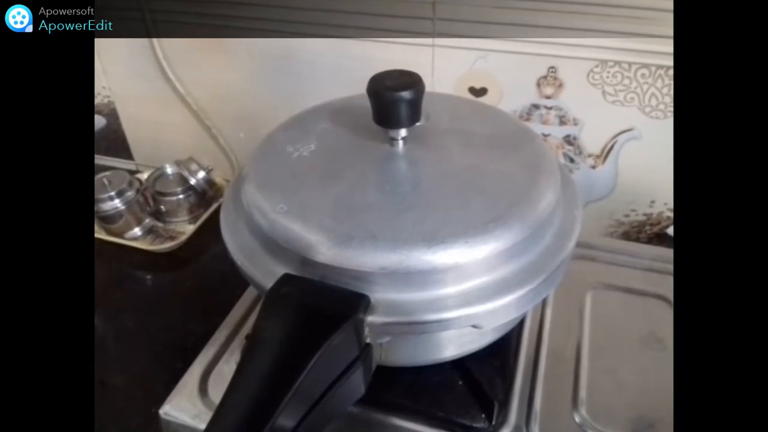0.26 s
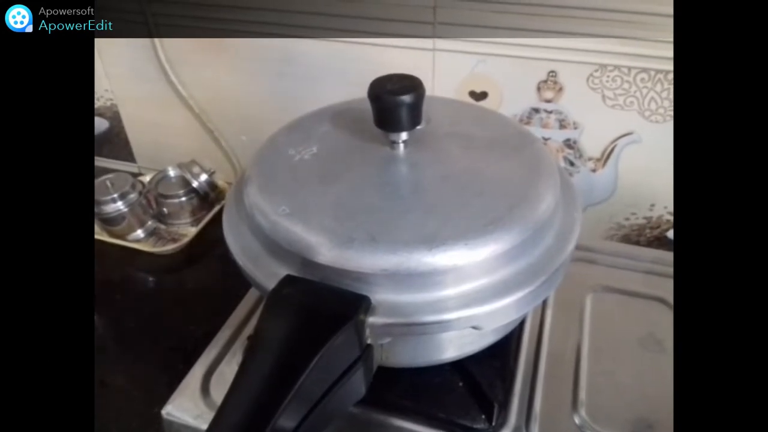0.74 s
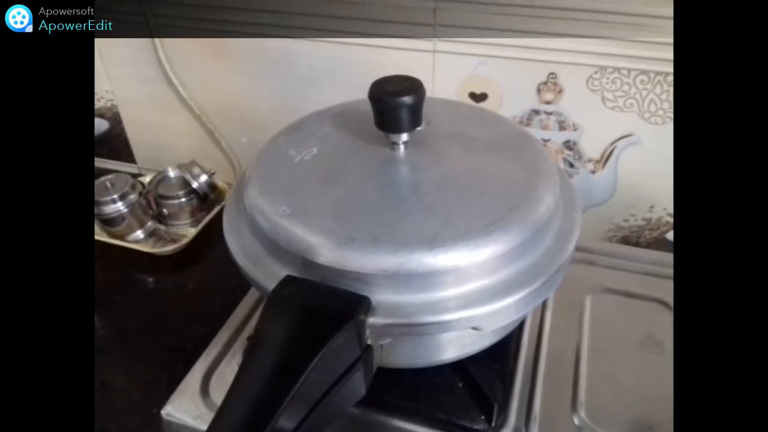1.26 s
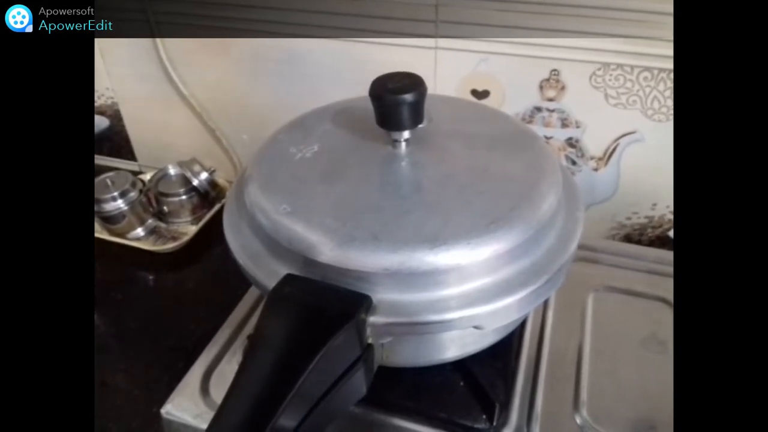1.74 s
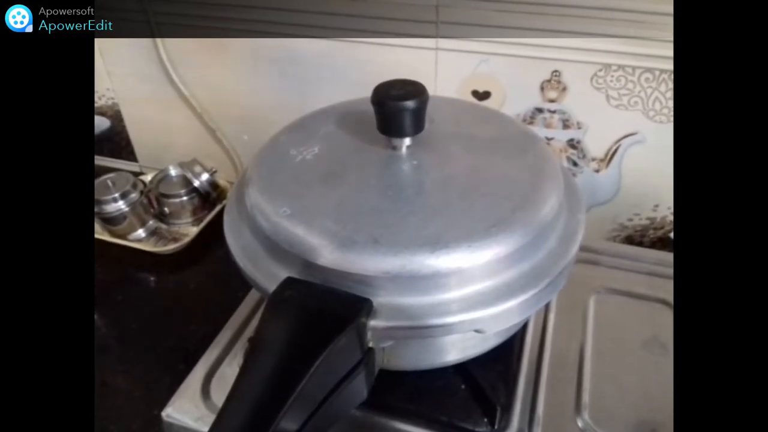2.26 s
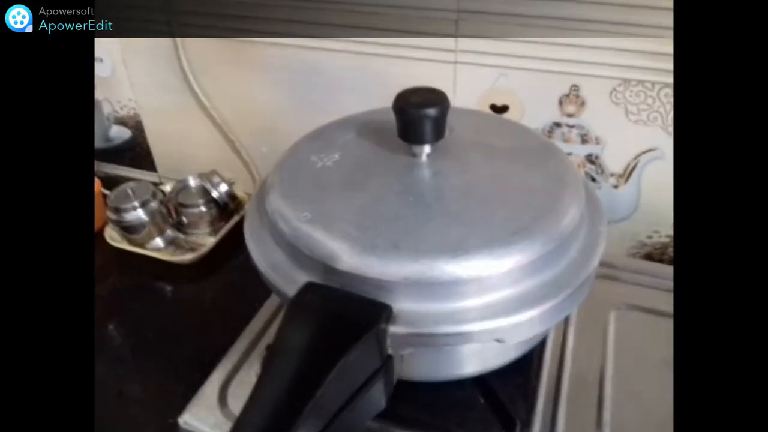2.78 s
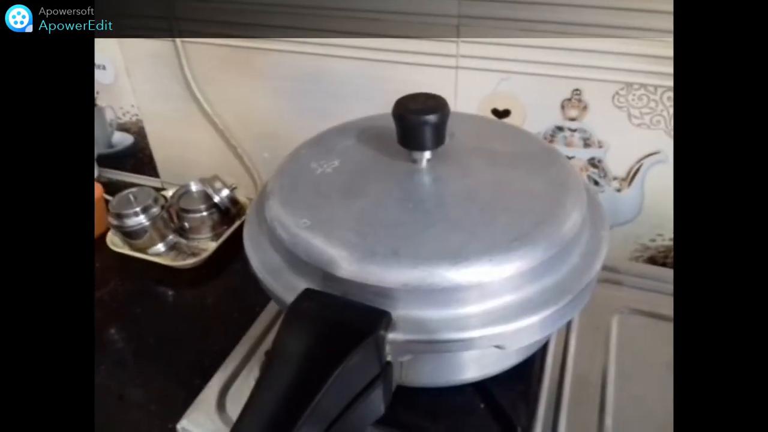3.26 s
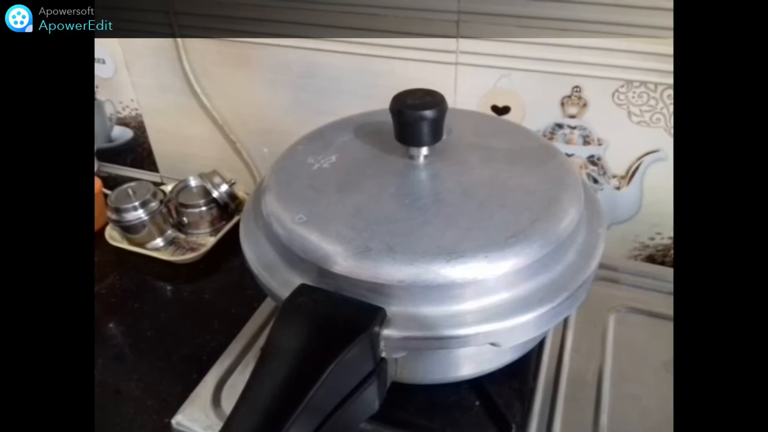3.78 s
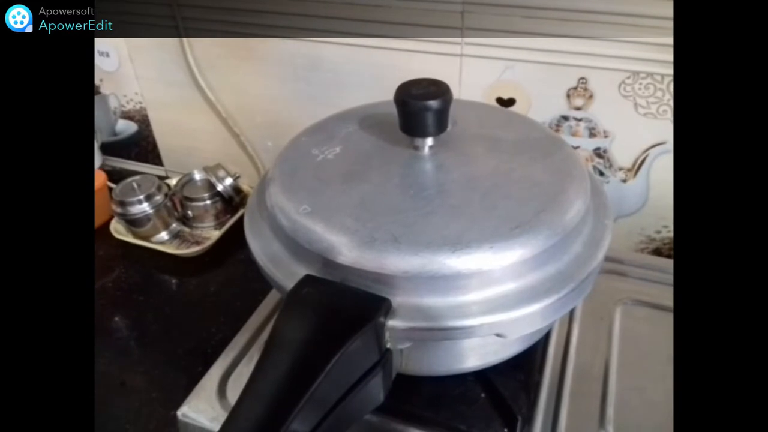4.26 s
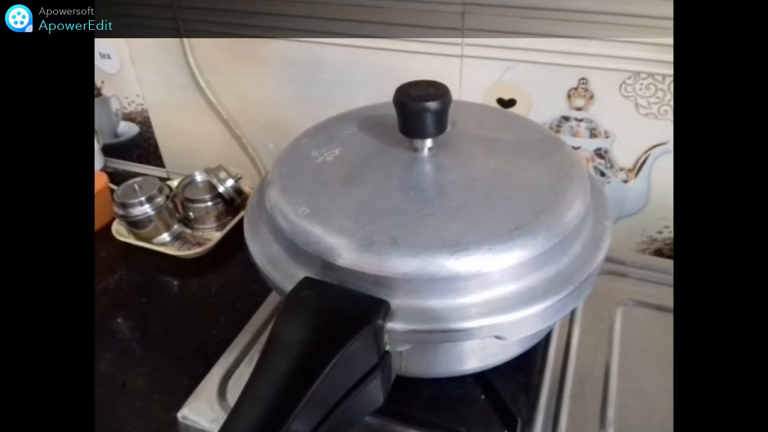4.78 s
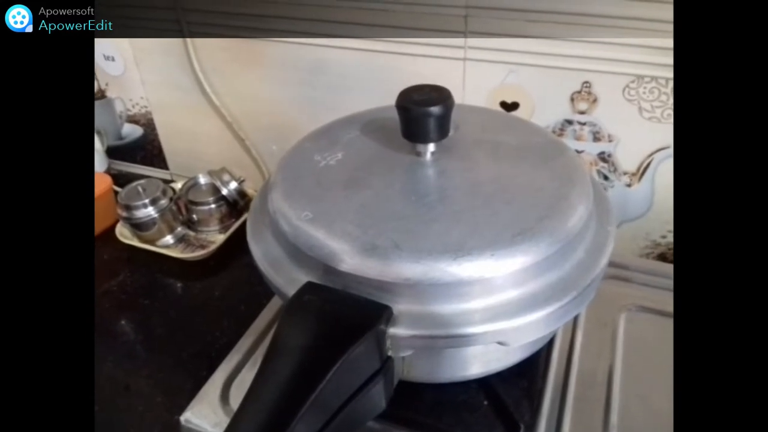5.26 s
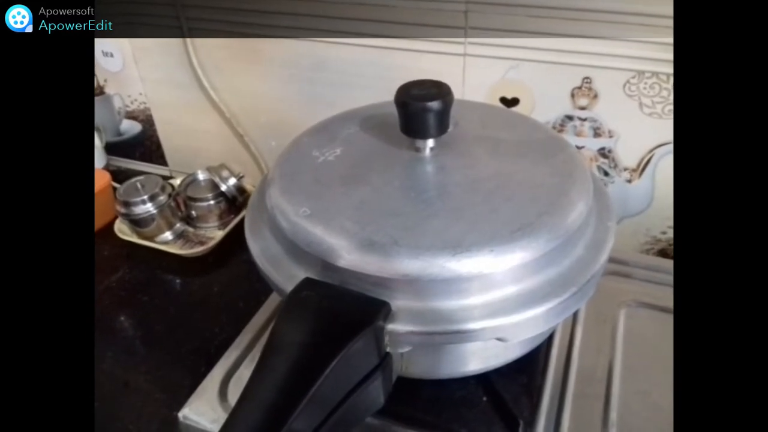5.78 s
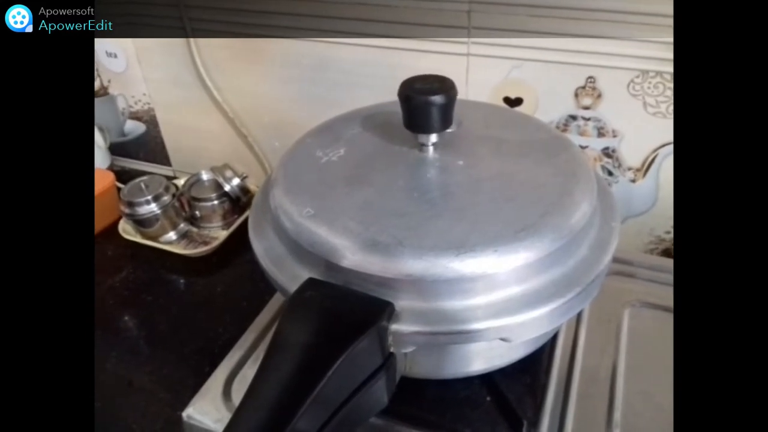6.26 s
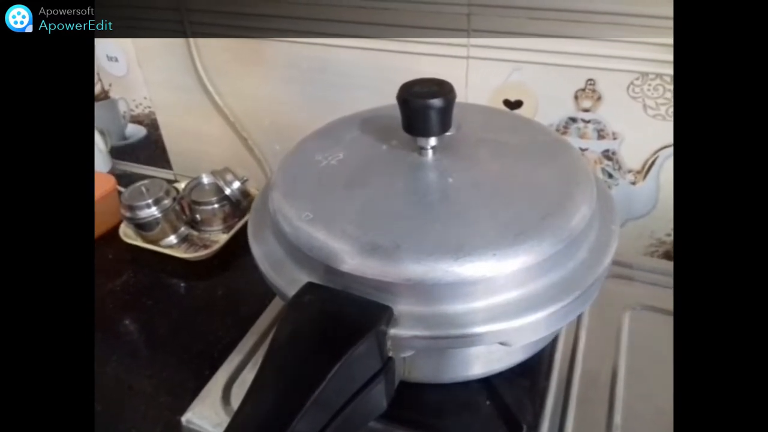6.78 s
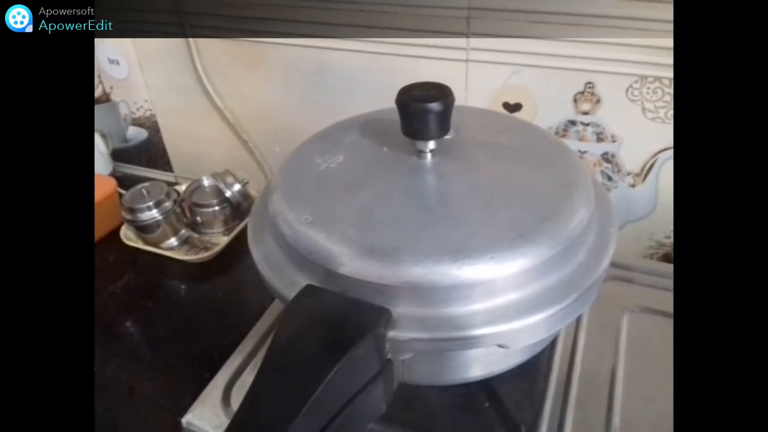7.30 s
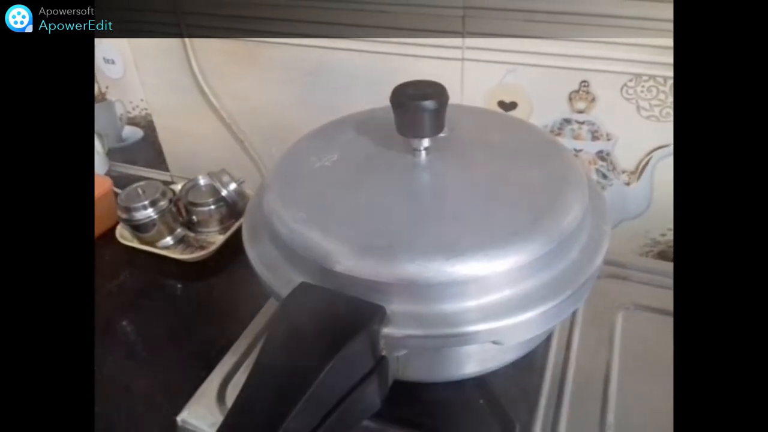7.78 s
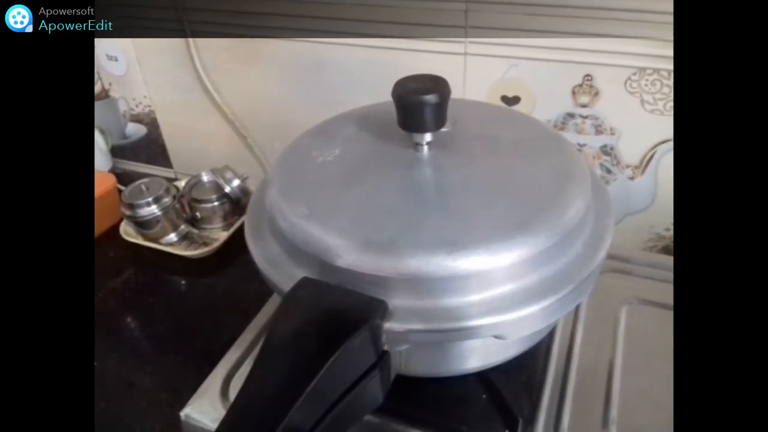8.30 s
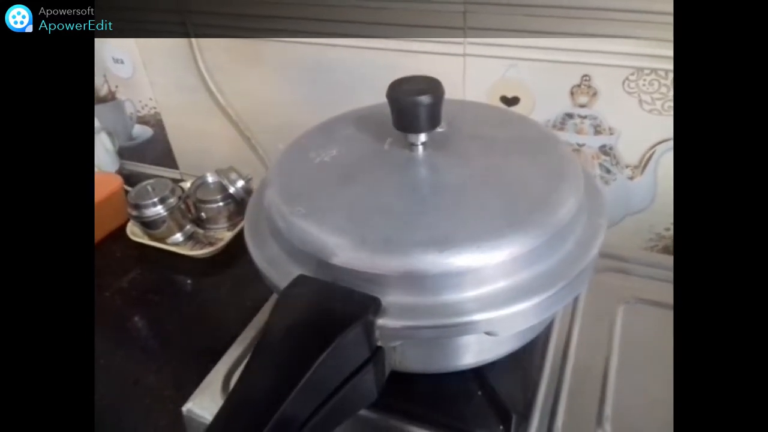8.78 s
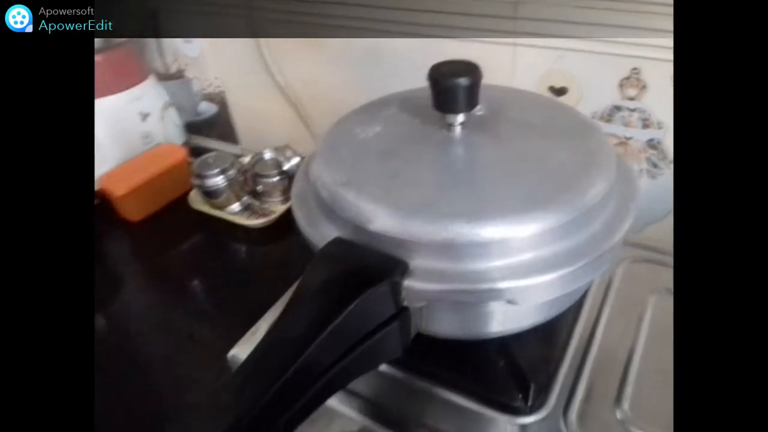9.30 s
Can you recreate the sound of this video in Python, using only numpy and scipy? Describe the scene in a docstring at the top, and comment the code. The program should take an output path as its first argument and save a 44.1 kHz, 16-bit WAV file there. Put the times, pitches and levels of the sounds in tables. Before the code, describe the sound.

Pressure cooker vent blasts loud crackling steam, clunks shut, sputters hissing puffs over a faint two-note drone, then the loud blast bursts out again.

```python
"""A pressure cooker on a stove, close to a small two-port microphone in a hard kitchen.
The open vent blasts steam as coloured, fluttering noise; the weight drops shut as a few ringing modes
and the room dies away. Later, steam sputters past the weight in noise puffs with a thin whistle, over
a far drone of two fuzzy notes and a faint burner and street, until the weight lifts again.
Blasts overflow the recorder: their samples wrap round and crackle."""
import sys
import numpy as np
from scipy import signal
from scipy.fft import rfft, irfft, next_fast_len
from scipy.io import wavfile
from scipy.ndimage import uniform_filter1d

SR = 44100
rng = np.random.default_rng(int(sys.argv[2]) if len(sys.argv) > 2 else 0)


def natural_amplitude(level_db):
    """Convert a level in decibels to a linear amplitude factor, elementwise."""
    exponent = np.asarray(level_db, float) / 20
    return 10 ** exponent


def persist_wave(psi):
    """Save psi, clipped to +-1, as 16-bit WAV."""
    counts = np.round(np.clip(psi, -1, 1) * 32767).astype(np.int16)
    wavfile.write(sys.argv[1], SR, np.atleast_2d(counts).T)


N = 420713
T = np.arange(N) / SR
HZ = np.fft.rfftfreq(512, 1 / SR)

# The vent standing open. Each row: start in seconds, stop in seconds, first and last level in dB
# (relative), rms flutter in dB.
BLASTS = [(0, 2.143, -18, -18.5, 1.5), (6.111, 9.54, -16, -17, 0.94)]
# Likeness of the sound at the two ports. Each row: frequency in Hz, correlation from -1 to 1.
PORTS_SAME = [(60, 0.92), (92, 1), (140, 1.0), (210, 0.99), (330, 1.0), (500, 1.0), (770, 1.0), (1170, 1.0),
              (1790, 1.0), (2740, 1), (4190, 0.95), (6410, 1), (9810, 0.52), (15000, -0.7)]
# Lean of the sound to the first port. Each row: frequency in Hz, first port over second in dB.
PORTS_LEAN = [(4400, 0), (8100, -3), (14000, 1.5)]


def evened(x):
    """Scales to rms 1."""
    return x / np.sqrt(np.mean(x ** 2) + 1e-20)


def read(points, hz):
    """Reads a table on a log-frequency axis."""
    f, value = np.transpose(points)
    return np.interp(np.log(hz + 1), np.log(f + 1), value)


def level(rows):
    """Gain along a curve of (seconds, dB), silent outside it."""
    s, db = np.transpose(rows)
    return natural_amplitude(np.interp(T, s, db, left=-200, right=-200))


def wander(hz):
    """Slow chance of rms 1: noise low-passed at hz."""
    low_pass = signal.butter(2, hz, fs=SR, output="sos")
    return evened(signal.sosfilt(low_pass, rng.standard_normal(N)))


def hiss(colour_db, patchy_db, same, lean):
    """Random short-time spectra at the two microphone ports, with drifting patches."""
    a, b, c, d, patches = rng.standard_normal((N // 128 + 5, len(HZ), 5)).T
    patches = uniform_filter1d(patches, size=6, axis=0)
    patches = evened(uniform_filter1d(patches, size=20, axis=1))
    same = np.clip(read(same, HZ), -1, 1)[:, None]
    first = a + 1j * b
    second = same * first + np.sqrt(1 - same ** 2) * (c + 1j * d)
    lean_db = read(lean, HZ) / 2
    port_db = np.array([colour_db + lean_db, colour_db - lean_db])[:, :, None]
    spectra = np.array([first, second]) * natural_amplitude(port_db + patchy_db * patches)
    return evened(signal.istft(spectra, nperseg=512, noverlap=384)[1][:, :N])


def room_lines(x, depth):
    """Narrow steady lines, as from room reflections and modes, stand out of the hiss."""
    # Each row: centre in Hz, width in Hz at half the dB lift, lift in dB before the depth factor.
    line_rows = [(2950, 45, 6), (3176, 48, 5), (3700, 45, 9), (3873, 48, 5), (4407, 60, 6), (5097, 40, 4),
                 (6696, 60, 4), (7032, 65, 4), (7500, 60, 3), (8000, 55, 3), (8312, 65, 4), (9976, 95, 3),
                 (10406, 60, 4), (13782, 130, 2)]
    size = next_fast_len(N)
    hz = np.fft.rfftfreq(size, 1 / SR)
    lift_db = sum(db / (1 + (2 * (hz - f) / width) ** 2) for f, width, db in line_rows)
    return evened(irfft(rfft(x, size) * natural_amplitude(depth * lift_db))[:, :N])


def blast():
    """Turbulent jet from the open vent, with a light flutter and a few falters."""
    # Colour of the open vent. Each row: frequency in Hz, relative level in dB per Hz.
    jet_colour = [(120, -43.5), (300, -34), (1100, -30), (2400, -22), (3400, -17), (5600, -20), (6400, -16),
                  (8120, -2.5), (9900, -21), (14300, -9.5), (16000, -15.5)]
    # Likeness at the two ports. Each row: frequency in Hz, correlation from -1 to 1.
    jet_same = [(2000, .99), (5000, 1), (8000, .9), (11000, .7), (15000, .6)]
    # Lean to the first port. Each row: frequency in Hz, first port over second in dB.
    jet_lean = [(4500, 0), (6500, -3), (7500, -4.6), (9000, -4.6), (11000, -.5)]
    # The jet falters for a moment. Each row: centre in seconds, dip in dB, width in seconds.
    falters = [(.37, -2, 0.01), (.525, -3, 0.013), (.88, -4, 0.014), (1.2, -5, 0.016), (1.449, -2.5, 0.024),
               (1.67, -5, .012)]
    jet = hiss(read(jet_colour, HZ), patchy_db=1.15, same=jet_same, lean=jet_lean)
    jet = room_lines(jet, depth=1.1)
    falter_db = sum(db * np.exp(-((T - s) / width) ** 2) for s, db, width in falters)
    flutter = wander(hz=55.4)
    flow = sum(level([(start, first_db), (stop, last_db)]) * natural_amplitude(flutter_db * flutter)
               for start, stop, first_db, last_db, flutter_db in BLASTS)
    return jet * flow * natural_amplitude(6.0 + falter_db)


def leak():
    """Wet steam through a narrow gap seeps steadily and spits in uneven puffs."""
    # Colour of the narrow gap. Each row: frequency in Hz, relative level in dB per Hz.
    gap_colour = [(1180, -48), (2000, -21), (2160, -17), (2550, -18.5), (3050, -12.5), (4620, -18),
                  (5530, -15.5), (7230, -1.5), (8150, 2), (10900, -14), (12200, -9.5), (13200, -8.5),
                  (15700, -17.5)]
    # Steady seep past the seated weight, growing with pressure until the weight lifts.
    # Each row: time in seconds, relative level in dB.
    seeping = [(2.722, -30.5), (3.6, -30), (4.0, -29), (5.95, -27.5), (6.055, -16), (6.112, -15)]
    # Puffs as the weight rocks. Each row: centre in seconds, relative peak in dB, half length in
    # seconds (to 1/e of the power).
    puff_rows = [(2.724, -28, 0.0095), (2.822, -25.5, 0.021), (2.91, -30.5, 0.017), (2.995, -25.5, 0.017),
                 (3.362, -29, 0.027), (3.417, -24, 0.011), (3.76, -25.5, 0.034), (3.872, -24.5, 0.029),
                 (3.97, -24.5, 0.019), (4.117, -20, 0.024), (4.218, -26.5, 0.018), (4.32, -25, .04),
                 (4.443, -25, 0.042), (4.63, -18.5, 0.027), (4.808, -20.5, 0.056), (4.94, -19.5, 0.03),
                 (5.122, -19, 0.01), (5.16, -22, 0.0094), (5.246, -28, 0.024), (5.43, -31, 0.055),
                 (5.532, -18, .025), (5.69, -18, 0.04), (5.752, -18, 0.019), (5.882, -20, 0.017)]
    seep = hiss(read(gap_colour, HZ), patchy_db=1.3, same=PORTS_SAME, lean=PORTS_LEAN)
    seep = room_lines(seep, depth=0.93)
    # doubled dB: seep and puffs add as powers
    puff_power = sum(natural_amplitude(2 * db) * np.exp(-((T - s) / half) ** 2) for s, db, half in puff_rows)
    flow = np.sqrt(level(seeping) ** 2 + puff_power * (T > seeping[0][0]))
    return seep * flow * natural_amplitude(2.2 * wander(hz=32.3))


def whistle():
    """Thin, breathy line of the leak: a sine whose pitch and level shake."""
    # Each row: time in seconds, pitch in Hz and relative level in dB, both about which it shakes.
    whistle_path = [(2.75, 3900, -54), (2.86, 3870, -59), (3.3, 3865, -49), (3.5, 3800, -50),
                    (3.87, 3870, -43), (3.95, 3860, -60)]
    s, hz, db = np.transpose(whistle_path)
    shaken_hz = np.interp(T, s, hz) * (1 + .004 * wander(hz=40))
    phase = 2 * np.pi * np.cumsum(shaken_hz) / SR
    return np.sin(phase) * level(np.transpose([s, db])) * natural_amplitude(1.5 * wander(hz=20))


def strikes(events, modes, rise_s):
    """Each blow rings the same decaying modes; a heavy one rings those under 1.3 kHz more."""
    t, out = T[:SR // 4], np.zeros(N)
    for s, peak_db, heavy_db in events:
        ring = sum(natural_amplitude(db + heavy_db * (hz < 1300) - 60 * t / t60) * np.sin(2 * np.pi * hz * t)
                   for hz, db, t60 in modes)
        ring = ring * (1 - np.exp(-t / rise_s))
        out[round(s * SR):][:len(t)] += natural_amplitude(peak_db) * ring / abs(ring).max()
    return out


def weight_knocks():
    """The weight knocks on its seat and rings the lid, with a soft onset."""
    # Each row: start in seconds, peak in dB, heaviness as dB on the modes under 1.3 kHz.
    knocks = [(2.135, -15, -13.5), (2.175, -21, -9), (3.615, -27.5, -25)]
    # Modes of the lid. Each row: frequency in Hz, relative level in dB, t60 in seconds.
    lid_modes = [(930, 0.5, 0.026), (987, -8, .06), (1166, -3, 0.027), (1340, -10, 0.015),
                 (1540, -10.5, 0.033), (1580, -24, 0.032)]
    return strikes(knocks, lid_modes, rise_s=0.005)


def metal_ticks():
    """Hot metal gives a dry tick: grate modes with a near-instant onset."""
    # Each row: start in seconds, peak in dB, heaviness as dB on the modes under 1.3 kHz.
    ticks = [(3.36, -12, -10)]
    # Modes of the grate. Each row: frequency in Hz, relative level in dB, t60 in seconds.
    grate_modes = [(804, -12, .01), (1230, 4, 0.023), (1600, -3, 0.012), (1950, 0, 0.011),
                   (2330, -0.5, 0.013), (2710, -6, 0.075), (3030, -1, 0.016), (3610, -7, 0.068)]
    return strikes(ticks, grate_modes, rise_s=.0001)


def drone():
    """Two far notes scattered on their way: each harmonic fades and turns at random, a fuzzy band."""
    # Each row: pitch in Hz, relative levels of harmonics 1, 2 and 3 in dB.
    drone_notes = [(720, -1.5, -0.5, -5), (775.5, 4, -6, -15.5)]
    # Four soundings. Each row: start in seconds, length in seconds, rise in seconds, level in dB.
    soundings = [(3.893, .51, 0.26, -35.5), (4.43, 0.555, 0.13, -35), (4.99, .57, 0.16, -33.5),
                 (5.553, .5, .04, -36.5)]
    fall_s = 0.042
    out = np.zeros(N)
    for hz, *harmonics_db in drone_notes:
        phase = 2 * np.pi * np.cumsum(hz * (1 + 0.00401 * wander(hz=8.1))) / SR
        for k, db in enumerate(harmonics_db):
            path = 1.08 + wander(hz=13.8) + 1j * wander(hz=28)
            out += natural_amplitude(db) * (path * np.exp(1j * (k + 1) * phase)).real
    envelope = 0
    for s, length, rise_s, db in soundings:
        ramps = np.minimum((T - s) / rise_s, (s + length - T) / fall_s)
        envelope = envelope + natural_amplitude(db) * np.clip(ramps, 0, 1)
    return evened(out) * envelope


def room(x):
    """Three sparse-tap tails fade in and out in turn, blurring narrow lines; each band has its own decay."""
    # Each row: frequency in Hz, t60 in seconds.
    room_decay = [(300, 0.4), (900, .42), (1500, 0.48), (4000, .4), (8000, .4), (14000, .25)]
    out = np.zeros((2, N))
    for k in range(3):
        # one tap of random sign at a random place in every 20 samples
        taps = np.zeros(SR // 2 + 20)
        taps[np.arange(100, SR // 2, 20) + rng.integers(0, 20, (SR // 2 - 81) // 20)] = 1
        taps *= rng.choice([-1., 1.], len(taps))
        hz, t, z = signal.stft(taps, SR, nperseg=256)
        decay = natural_amplitude(-60 * t / read(room_decay, hz)[:, None])
        tail = signal.istft(z * decay, SR, nperseg=256)[1]
        turn = np.sqrt(2 / 3) * np.cos(np.pi * (T * 1.3 + k / 3))  # the three squares sum to 1
        out += signal.oaconvolve(x * turn, tail[None] / np.linalg.norm(tail), axes=1)[:, :N]
    return out


def kitchen():
    """Burner roar and street wash as patchy hiss, thin under the lowest octave."""
    # Colour of burner and street. Each row: frequency in Hz, relative level in dB per Hz.
    wash_colour = [(60, 6), (115, -6), (350, -2.5), (670, -5.5), (960, -3), (1100, -5.5), (2500, -12.5),
                   (3800, -14), (4600, -25.5), (6300, -18), (7600, -17.5), (9000, -17.5), (11700, -34),
                   (19800, -120)]
    # Faint until it steps up at once; sinks again under the blast.
    # Each row: time in seconds, relative level in dB.
    background = [(0, -66.5), (2.721, -56.5), (2.723, -43), (6.03, -41), (6.11, -52), (6.3, -66),
                  (9.54, -62)]
    wash = hiss(read(wash_colour, HZ), patchy_db=2.0, same=PORTS_SAME, lean=PORTS_LEAN)
    upper = signal.sosfilt(signal.butter(6, 94, "high", fs=SR, output="sos"), wash)
    return (upper + natural_amplitude(-21.5) * wash) * level(background)


def scene():
    """Cooker close by and in the room, over drone and background."""
    metal = weight_knocks() + metal_ticks()
    near = blast() + leak() + whistle()
    far = drone()
    wet = natural_amplitude(-4.5) * room(near + natural_amplitude(1.5) * metal + natural_amplitude(-3.5) * far)
    return natural_amplitude(-1.0) * near + metal + far + wet + kitchen()


def overflow(x):
    """While a blast overdrives the input, samples past full scale wrap to the other sign and click."""
    full_scale = .7  # sample value
    blasting = sum((T >= start) & (T <= stop) for start, stop, *_ in BLASTS) > 0
    return np.where(blasting, (x + full_scale) % (2 * full_scale) - full_scale, x)


def bass_cut(x):
    """A mild high-pass throughout, mixed with a stronger one at set times."""
    # Each row: time in seconds, share of the stronger cut from 0 to 1.
    strong_share = [(0, 0.55), (2.72, 0.5), (2.73, 0), (7.28, 0), (7.32, 0.7), (9.54, 0.6)]
    mild = signal.sosfilt(signal.butter(2, 75, "high", fs=SR, output="sos"), x)
    strong = signal.sosfilt(signal.butter(1, 600, "high", fs=SR, output="sos"), mild)
    share = np.clip(np.interp(T, *np.transpose(strong_share)), 0, 1)
    return share * strong + (1 - share) * mild


def treble_holes(x, from_hz, under_db, scatter_db):
    """Treble bands far under the loudest band drop out of sum or difference in patches, a watery sound."""
    mid_side = np.array([x[0] + x[1], x[0] - x[1]]) / 2
    hz, _, z = signal.stft(mid_side, SR, nperseg=1024, noverlap=768)
    power = (abs(z[:, :512]) ** 2).reshape(2, 32, 16, -1).sum(axis=2)  # 32 bands of 16 bins
    band_db = 10 * np.log10(abs(uniform_filter1d(power, size=5, axis=2)) + 1e-20)
    chance = evened(uniform_filter1d(rng.standard_normal(band_db.shape), size=9, axis=2))
    margin_db = band_db - band_db.max(axis=(0, 1)) + under_db + scatter_db * chance
    keep = 1 / (1 + np.exp(-np.clip(3 * margin_db, -30, 30)))  # soft switch
    keep = np.repeat(keep, 16, axis=1)
    z[:, :512] *= np.where(hz[:512, None] > from_hz, keep, 1)
    mid, side = signal.istft(z, SR, nperseg=1024, noverlap=768)[1][:, :N]
    return np.array([mid + side, mid - side])


def band_limit(x):
    """A steep low-pass takes off the top of the treble."""
    edge = signal.firwin(1023, 15720, window=("kaiser", 8), fs=SR)
    return signal.oaconvolve(x, edge[None], "same")


def roll_off(x):
    """The treble ends steeply here."""
    return signal.sosfilt(signal.butter(12, 16660, fs=SR, output="sos"), x)


def record(dry):
    """Blasts overflow the recorder; then the bass thins, weak treble drops out and the band is limited."""
    thinned = bass_cut(overflow(dry))
    holed = treble_holes(thinned, from_hz=9650, under_db=17, scatter_db=13.0)
    mix = band_limit(holed)
    return roll_off(mix)


dry = scene()
out = record(dry)
persist_wave(out)
```